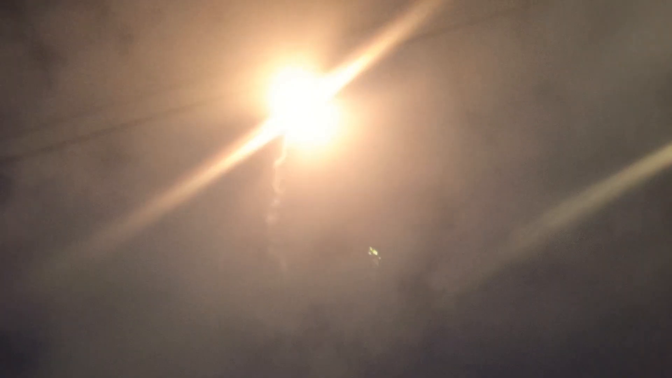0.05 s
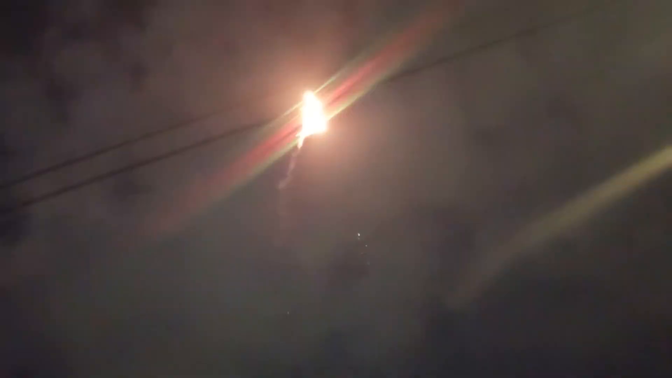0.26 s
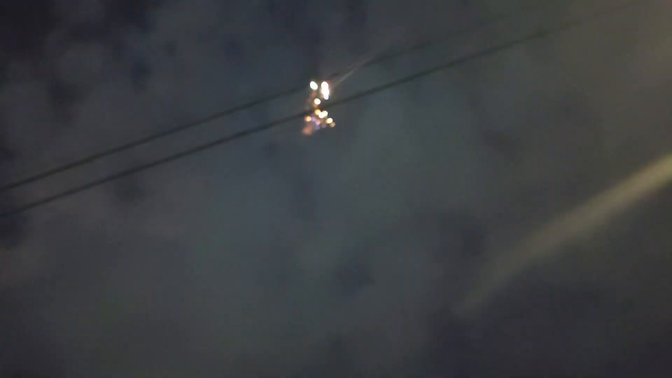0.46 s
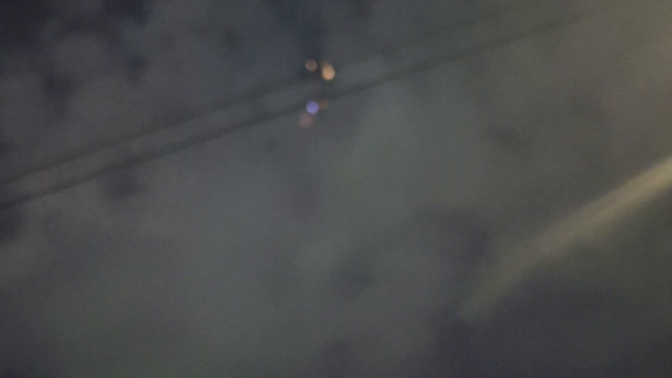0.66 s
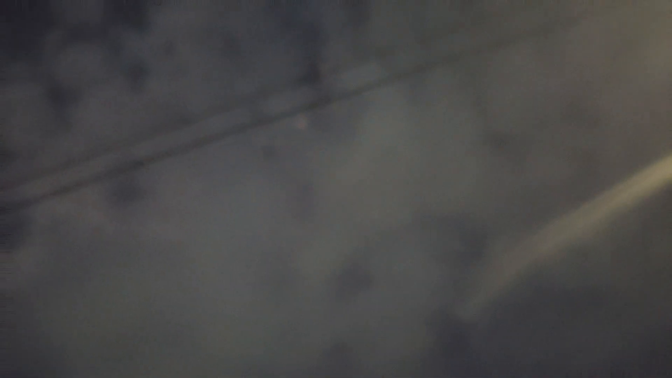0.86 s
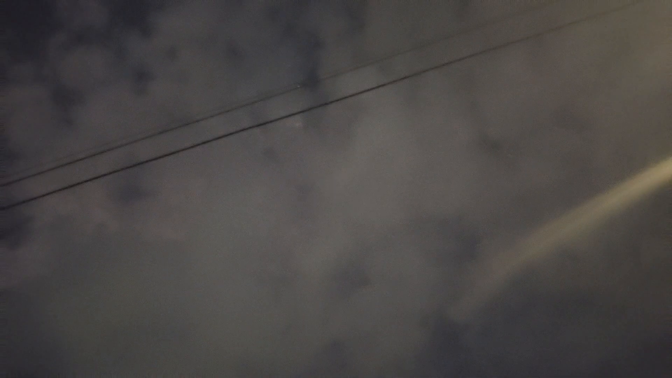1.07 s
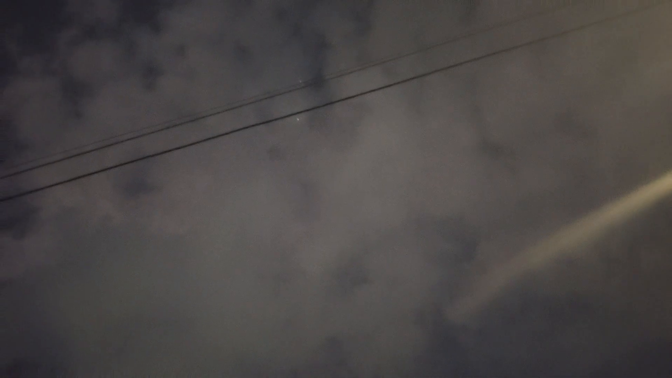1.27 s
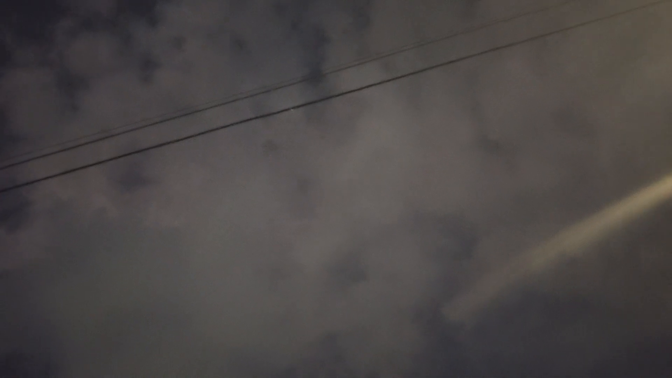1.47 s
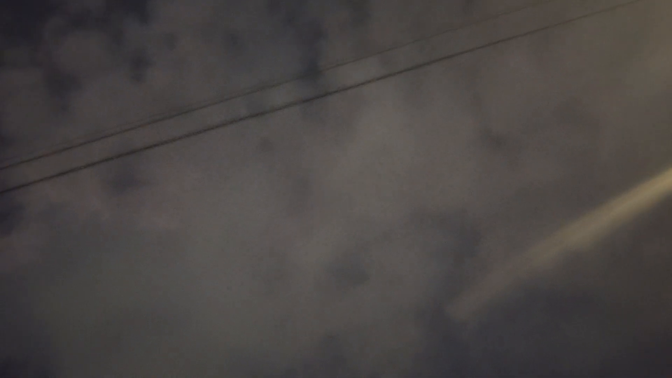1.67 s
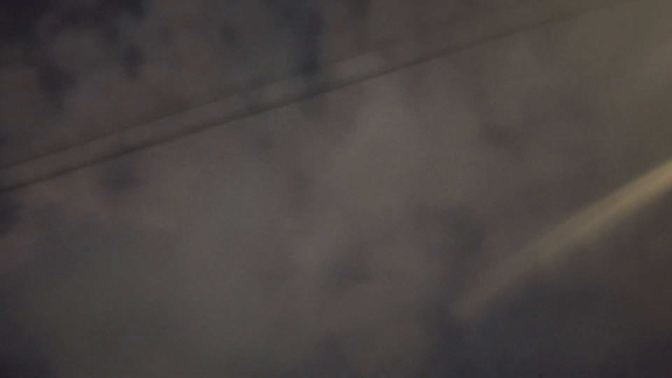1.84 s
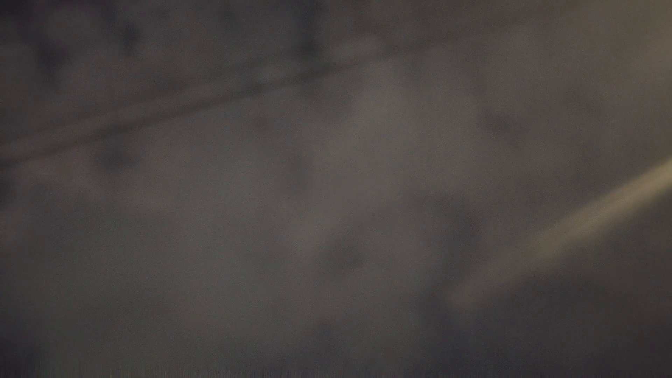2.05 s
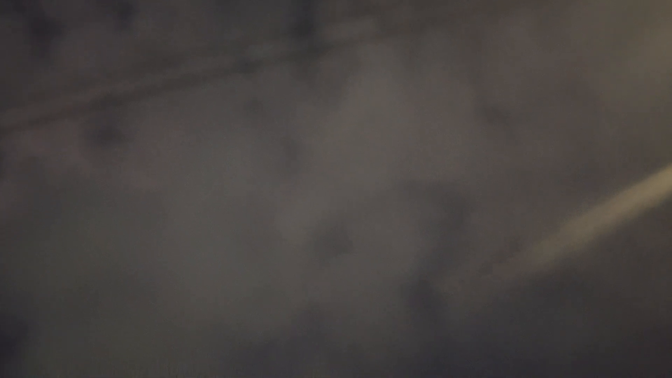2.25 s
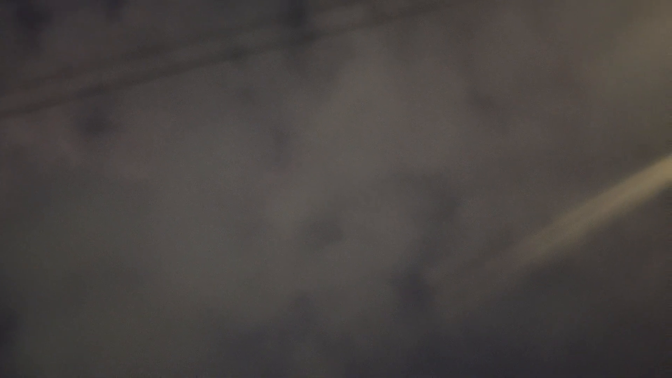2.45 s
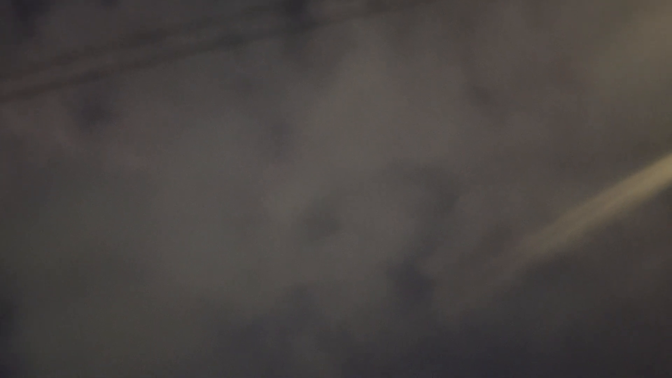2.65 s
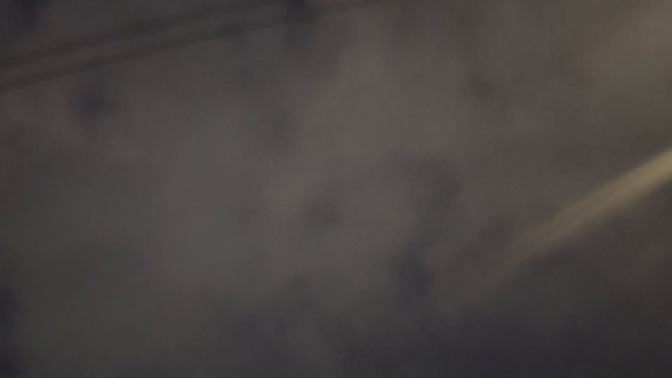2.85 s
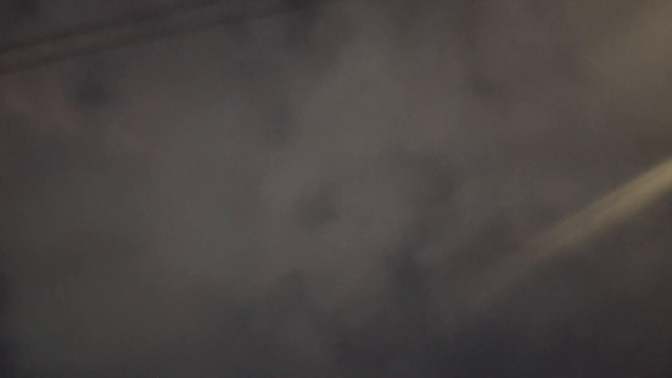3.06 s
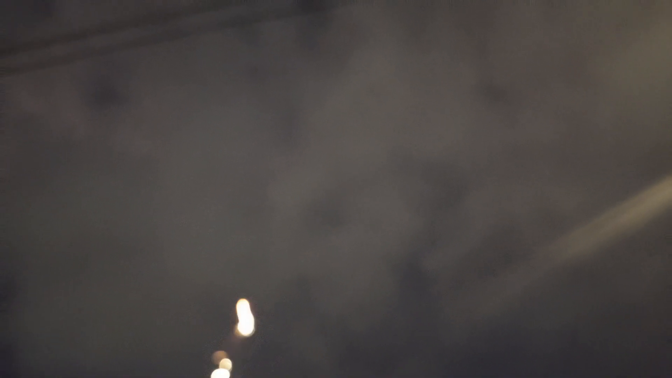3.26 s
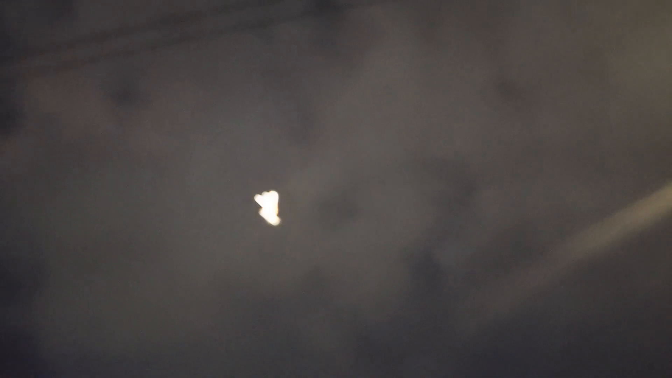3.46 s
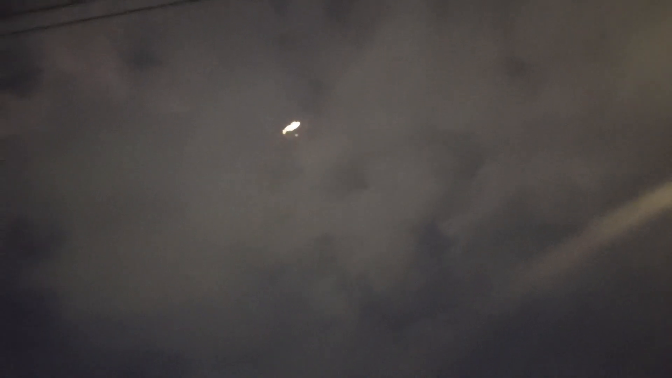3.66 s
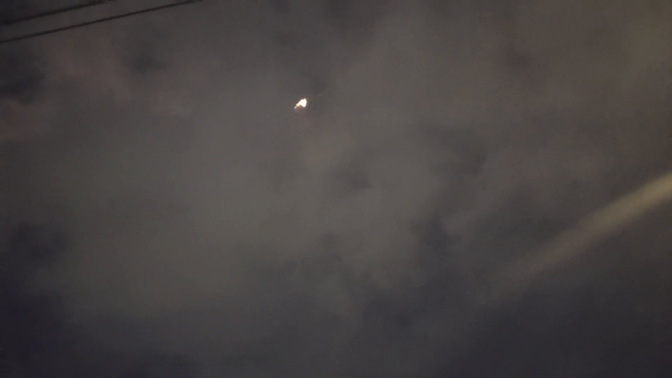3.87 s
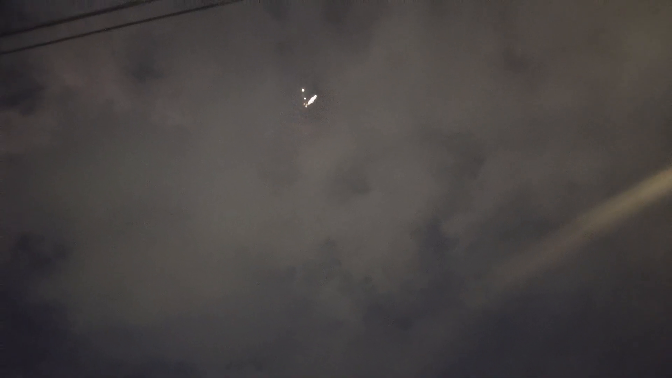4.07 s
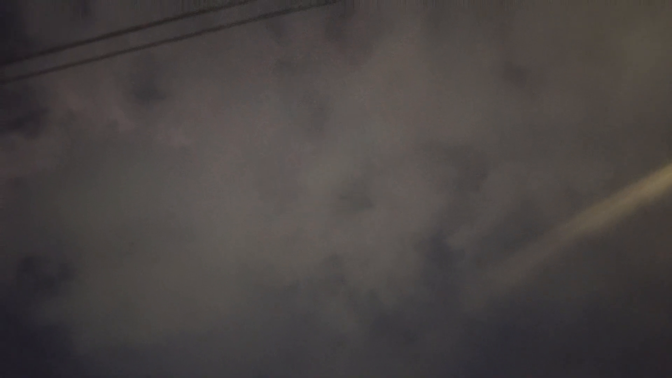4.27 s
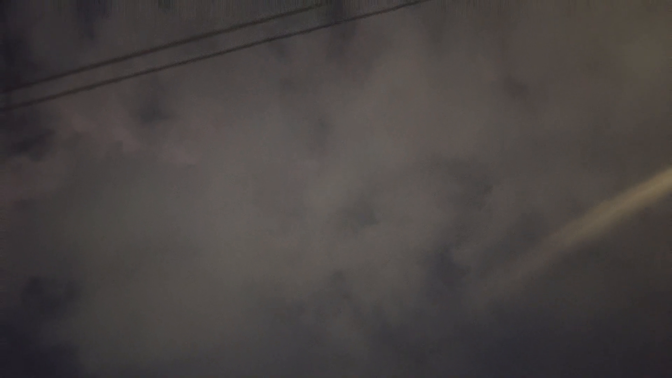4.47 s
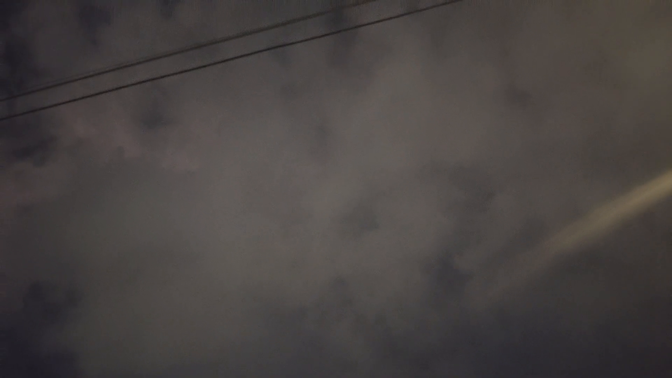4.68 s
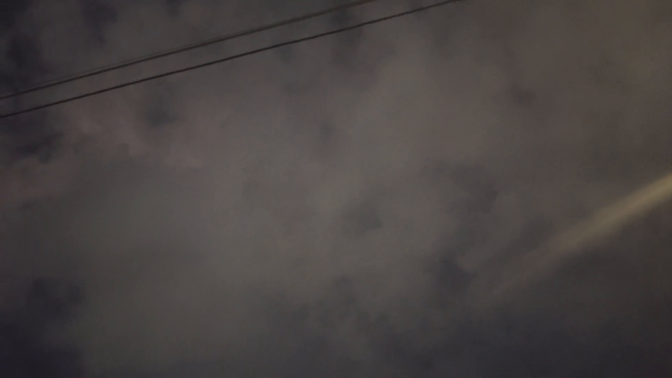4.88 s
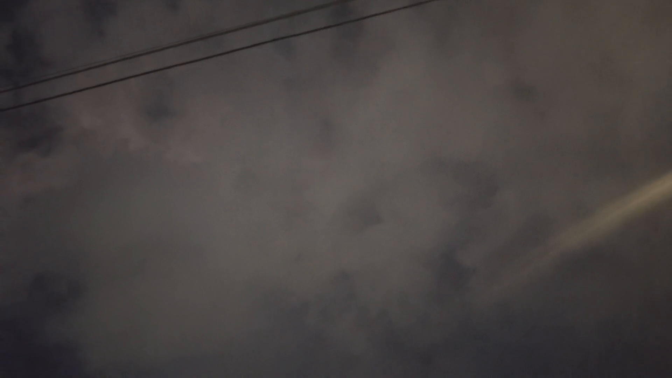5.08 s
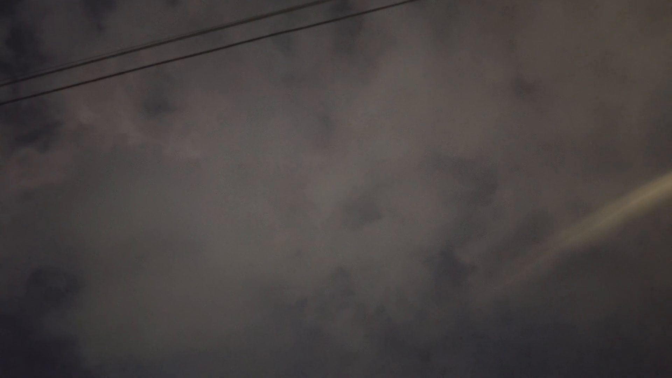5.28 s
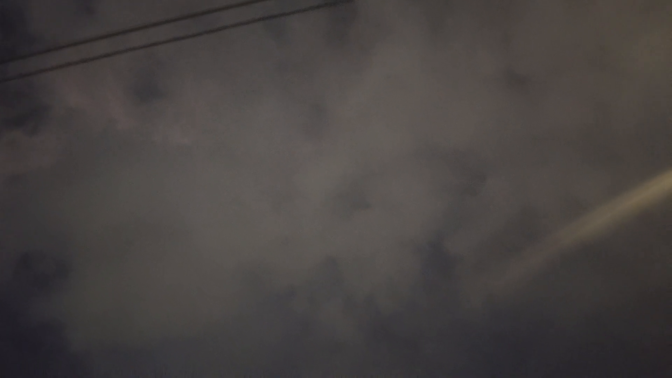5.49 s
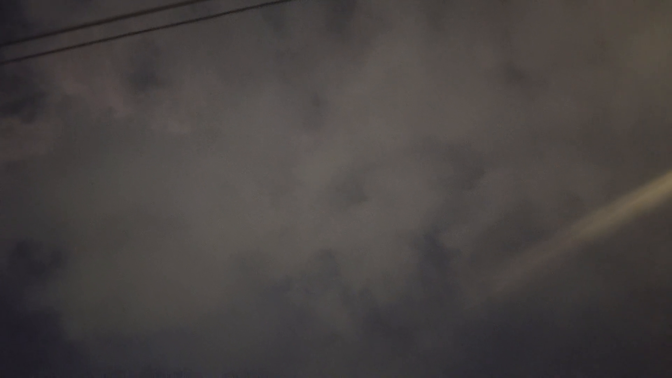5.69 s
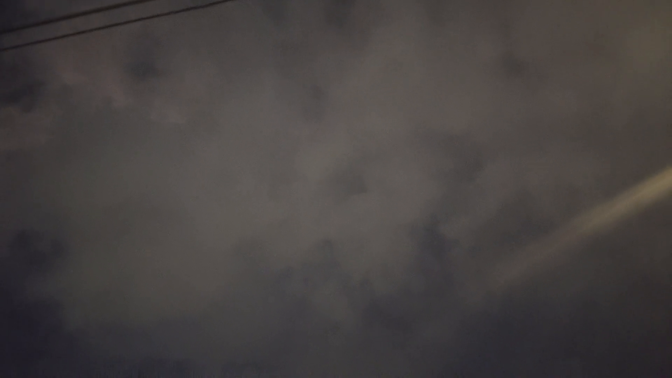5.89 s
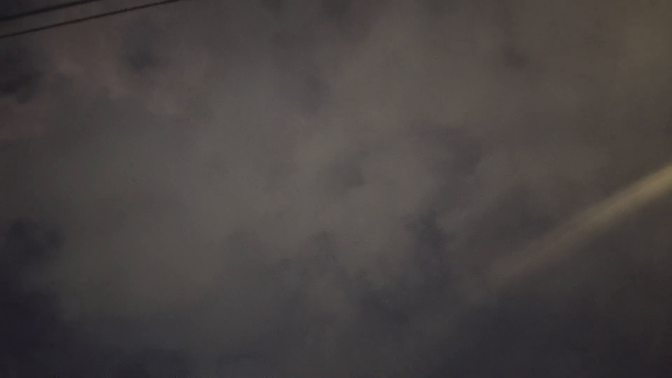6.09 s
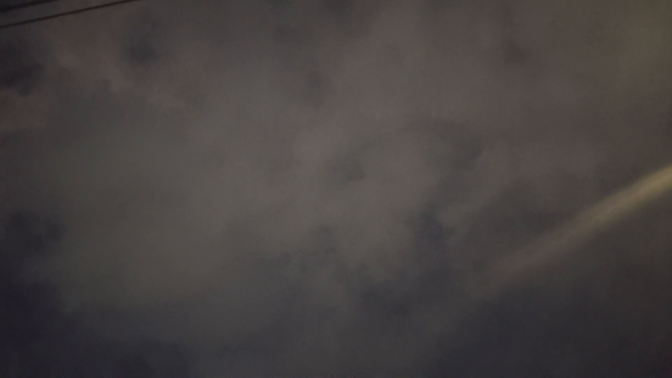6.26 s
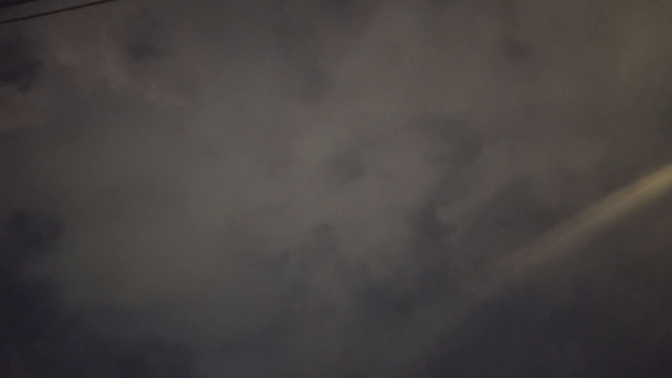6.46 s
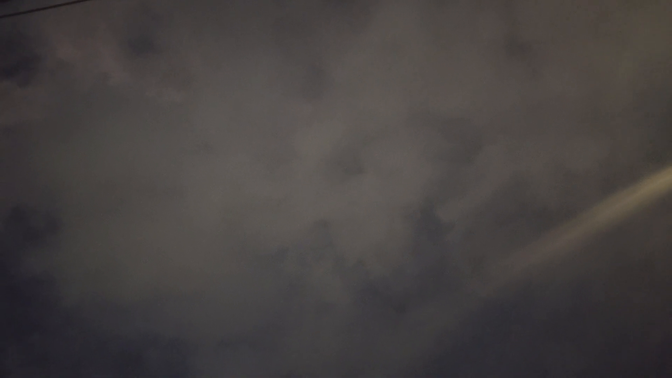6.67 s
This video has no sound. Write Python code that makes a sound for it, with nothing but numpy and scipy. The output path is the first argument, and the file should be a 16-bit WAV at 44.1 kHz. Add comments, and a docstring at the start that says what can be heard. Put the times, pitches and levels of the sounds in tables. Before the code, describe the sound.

Night street: a firework crack and passing motorbike, then a launch bang with a shrill warbling whistle dropping in pitch, quiet, and one late pop.

```python
"""Firework tube beside a night street

A shot rings off the houses while a motorbike passes; its engine is firing-rate tones, thuds and puffs of noise.
Then a whistling star is launched, tumbles, falls in pitch and dies into its echo: a gliding tone with
overtones and a hiss, repeated by sparse echoes. Sparks spit and a far shell pops: short pulses and noise.
Traffic rumble, shaped noise, fades away and insects hum faintly in narrow noise bands.
"""
import sys
import numpy as np
from scipy import signal
from scipy.io import wavfile
from scipy.ndimage import uniform_filter1d

SR = 44100
rng = np.random.default_rng(int(sys.argv[2]) if len(sys.argv) > 2 else 0)


def dump(signal):
    """Clip the signal to [-1, 1] and save it as 16-bit WAV at the path in sys.argv[1]."""
    limited = np.clip(np.atleast_2d(signal).T, -1, 1)
    pcm = np.round(limited * 32767).astype(np.int16)
    wavfile.write(sys.argv[1], SR, pcm)


N = 296793
T = np.arange(N) / SR
LIT_S, OUT_S = 3.178, 4.328  # the star burns between these moments


def gain_of(db):
    """Turns decibels into a gain."""
    return 10 ** (np.asarray(db) / 20)


def evened(x):
    """Scales a sound to rms 1."""
    return x / np.sqrt(np.mean(x ** 2) + 1e-20)


def read(points, hz):
    """Reads a table between its points, on a log-frequency axis."""
    f, value = np.transpose(points)
    return np.interp(np.log(hz + 1), np.log(f + 1), value)


def columns(rows, t):
    """Joins the rows of a curve by straight lines in time."""
    s, *rest = np.transpose(rows)
    return [np.interp(t, s, c) for c in rest]


def gate(start, end, edge):
    """Opens around start and closes around end, each over edge seconds."""
    return np.clip(np.minimum(T - start, end - T) / edge + .5, 0, 1)


def add(mix, s, sound, pan_db, lag=0):
    """Places a sound in time and between the channels; the left lags by lag samples."""
    pair = sound * gain_of([[pan_db / 2], [-pan_db / 2]])
    for channel, side, late in zip(mix, pair, (max(lag, 0), max(-lag, 0))):
        part = channel[round(s * SR) + late:][:len(side)]
        part += side[:len(part)]


def resonate(x, hz, width):
    """Keeps a band around hz: shifts hz down to zero, smooths, and shifts back."""
    turn = np.exp(2j * np.pi * hz * np.arange(x.shape[-1]) / SR)
    r = np.exp(-np.pi * width / SR)
    return 2 * (turn * signal.lfilter([1 - r], [1, -r], x / turn)).real


def wander(count, size):
    """Smooth chance of rms 1 that changes over size samples."""
    return evened(uniform_filter1d(uniform_filter1d(rng.standard_normal(count), size), size))


def noise(count, size, shape_db, patchy_db, lag=0):
    """Stereo noise from random short spectra; shape_db(hz, s) colours it, the left lags by lag samples."""
    # how alike left and right are: f/Hz, likeness (1 = identical)
    likeness = [(60, 0.97), (180, 0.98), (550, 0.013), (16000, 0.19)]
    hop = size // 4
    frames, hz = count // hop + 5, np.fft.rfftfreq(size, 1 / SR)[:, None]
    a, b, c, d, patches = rng.standard_normal((frames, len(hz), 5)).T
    patches = evened(uniform_filter1d(uniform_filter1d(patches, 4, 0), 8, 1))
    same = np.clip(read(likeness, hz), -1, 1)
    right = a + 1j * b
    shared = same * right * np.exp(-2j * np.pi * hz * lag / SR)
    left = shared + np.sqrt(1 - same ** 2) * (c + 1j * d)
    level_db = shape_db(hz, np.arange(frames) * hop / SR) + patchy_db * patches
    z = np.array([left, right]) * gain_of(level_db)
    return signal.istft(z, nperseg=size, noverlap=size - hop)[1][:, :count]


def street():
    """Traffic rumble and tyre hiss, the night air and insects are noises of different colour and width."""
    # loudness of the traffic: t/s, rumble/dB, tyre hiss/dB
    traffic = [(0, -24.5, -39), (.3, -28, -39), (.65, -33, -47.5), (1.1, -34.5, -40), (1.6, -35, -47.5),
               (3.1, -37.5, -53), (3.6, -33, -70), (4.3, -34.5, -50.5), (4.6, -44.5, -49), (5, -54, -63),
               (6.73, -61.5, -69.5)]
    # colour of the rumble: f/Hz, level per Hz/dB
    rumble_colour = [(20, -27), (50, -8), (75, -0.5), (110, 4), (170, -9), (260, -16), (500, -74.5)]
    # colour of the tyre hiss: f/Hz, level per Hz/dB
    hiss_colour = [(260, -11), (800, -14), (1240, -19.5), (2000, -17), (2600, -20.5), (3500, -38.5),
                   (5600, -36), (7000, -70), (9300, -41.5), (11500, -57.5), (16000, -57.5)]
    # colour of the quiet town air: f/Hz, level per Hz/dB
    night_colour = [(18, -27), (30, -1.5), (88, -5.5), (1910, -23.5), (2750, -49.5), (3060, -33),
                    (6050, -41.5), (6900, -35), (16000, -58.5)]
    # humming insects: f/Hz, width/Hz, level/dB
    insect_bands = [(3013, 160, -76), (6850, 200, -76), (9730, 1900, -81)]
    night_db = -56
    rumble_db, hiss_db = columns(traffic, T)
    # the left lags, so the rumble comes from the right
    rumble = evened(noise(N, 4096, lambda hz, s: read(rumble_colour, hz), patchy_db=2, lag=18))
    hiss = evened(noise(N, 1024, lambda hz, s: read(hiss_colour, hz), patchy_db=2.0))
    night = evened(noise(N, 2048, lambda hz, s: read(night_colour, hz), patchy_db=0.0))
    air = rng.standard_normal((2, N))
    out = gain_of(rumble_db) * rumble + gain_of(hiss_db) * hiss + gain_of(night_db) * night
    for hz, width, db in insect_bands:
        out += gain_of(db) * evened(resonate(resonate(air, hz, width), hz, width))
    return out


def motorbike():
    """Far off, only twice the firing rate carries; close by, uneven firings thud and gas rushes out."""
    # engine speed: t/s, firing rate/Hz
    revs = [(0, 59.94), (.68, 55.23), (.88, 80.67), (1.02, 86.06), (1.2, 82.64), (1.53, 70.18),
            (2.72, 58.55)]
    # open throttle, when the exhaust note carries: start/s, end/s, level/dB, level change/(dB/s)
    throttle = [(0.16, 0.41, -30, -25), (0.739, 1.376, -27, -10), (1.483, 2.775, -33, -0.5)]
    # exhaust rush heard close by: f/Hz, width/Hz, level/dB
    exhaust = [(325, 94, -7.5), (1990, 1090, -5.5), (4882, 4300, -27), (9030, 1500, -25.5),
               (14600, 3200, -38)]
    # gap between the walls where the bike is in view: start/s, end/s
    in_view = (0.802, 1.011)
    throttle_edge_s, screen_db = 0.083, -10  # walls screen the bike outside the gap
    pass_s, pass_db, closest_m, speed_m_per_s = 0.97, -25, 2.86, 17  # the closest moment
    gone_s = 2.9  # it turns a corner
    fourth_db = -10  # four times the firing rate booms close by
    hz, = columns(revs, T)
    away = (T - pass_s) * speed_m_per_s / closest_m
    near_db = pass_db - 10 * np.log10(1 + away ** 2) - 200 * np.maximum(T - gone_s, 0)
    near_db = near_db + screen_db * (1 - gate(*in_view, 0.13))
    pull = np.zeros(N)
    for start, end, db, fading in throttle:
        level_db = db + fading * np.clip(T - start, 0, end - start)
        pull += gate(start, end, throttle_edge_s) * gain_of(level_db)
    turns = np.cumsum(hz * (1 + .012 * wander(N, size=900))) / SR
    note = np.sqrt(2) * np.sin(4 * np.pi * turns) * pull * gain_of(1.0 * wander(N, size=1500))
    note += np.sin(8 * np.pi * turns) * gain_of(near_db + fourth_db)
    turns = turns + .11 * wander(N, size=300)  # ragged ignition
    firing, since = turns.astype(int), turns % 1
    strength = 0.7 + rng.random(N)[firing] ** 2
    thuds = -evened(resonate(strength * np.exp(-((since - .15) / 0.048) ** 2), 167, 180))
    out = np.zeros((2, N))
    add(out, 0, note + gain_of(near_db + 1.5) * thuds, 0, lag=18)
    for f, width, db in exhaust:
        gust = 1.53 * rng.random(N)[firing] ** 3  # each firing spits unevenly into each band
        puffs = (0.3 + gust * np.exp(-since / 0.34)) * rng.standard_normal((2, N))
        air_db = (near_db - near_db.max()) * f / 13000.  # distance takes the treble first
        rush = evened(resonate(resonate(puffs, f, width), f, width))
        add(out, 0, gain_of(near_db + db + air_db) * rush, -4.)
    return out


def drones():
    """Engines farther off hum briefly as steady low sines."""
    # hums of other traffic: start/s, end/s, f/Hz, level/dB
    hums = [(0, 0.226, 100, -33), (1.043, 1.3, 94.8, -32)]
    out = np.zeros((2, N))
    for start, end, hz, db in hums:
        hum = np.sqrt(2) * gate(start, end, 0.13) * np.sin(2 * np.pi * hz * T)
        add(out, 0, gain_of(db) * hum, 0, lag=18)
    return out


def blasts():
    """A pressure jump and suction, then small bounces that pull the other way; air takes the top."""
    # blasts and slaps off walls: t/s, peak before the air dulls it/dB, pulse width/ms, left-right/dB
    bangs = [(0.1299, -0.5, 0.12, -4), (0.1425, -8, 0.17, 7.5), (3.1756, -5, 0.12, 13.5),
             (3.2116, -11, 0.33, 10), (3.293, -5.5, 0.088, -5), (3.3309, -11, 0.22, 9.5),
             (3.3698, -9, 0.093, 7.5), (6.4196, -15.5, 0.13, 4)]
    scatter_db, scatter_ms = -2.5, 0.78  # the ground near the tube scatters each one
    lift_s, lift_db, lift_ms = 3.1716, -8.5, 1.56  # the low push of the lift charge
    out, t = np.zeros((2, N)), np.arange(400) / SR
    air = signal.butter(4, 6200, fs=SR, output="sos")
    chance = rng.standard_normal((len(bangs) + 1, 2, len(t)))
    for (s, db, ms, pan_db), bounces in zip(bangs, chance):
        u = t * 1000 / ms - 3
        pulse = -u * np.exp(.5 - u ** 2 / 2)
        after = np.maximum(t * 1000 - 4 * ms, 0) / scatter_ms
        rough = resonate(bounces, 1000 / ms * 0.38, 2300.0) * 2.8 - 1.2
        cluster = after * np.exp(-after ** 2) * rough
        add(out, s, gain_of(db) * signal.sosfilt(air, pulse + gain_of(scatter_db) * cluster), pan_db)
    u = (t - t.mean()) * 1000 / lift_ms
    rough = 1 + 1.33 * resonate(chance[-1], 810.0, 1640.0)
    add(out, lift_s - t.mean(), gain_of(lift_db) * np.exp(-u ** 2 / 2) * rough, 0)
    return out


def rolls():
    """Dense echoes of a bang swell and die as noise, the treble first."""
    # crowds of echoes: t/s, level/dB, rise/s, length and time of the common 60 dB fade/s,
    # treble shelf/dB, left-right/dB
    crowds = [(0.134, -31.5, 0.072, 1.66, 4, -7.5), (2.6, -56, 0.0068, 1.05, -33, -9),
              (2.76, -47, 0.11, 0.82, -26, -6), (3.178, -26.5, 0.15, 1.7, -2.5, -1),
              (6.41, -16, 0.033, 0.23, -18, -1.5), (6.438, -34.5, 0.28, 0.8, -5.5, -6.5),
              (6.568, -36, 0.026, 0.57, -12.5, -5)]
    # colour of the echoes: f/Hz, level per Hz/dB
    colour = [(60, -53), (250, -17.5), (1000, -17.5), (2000, -11), (2600, -13), (3400, -19), (5900, -25.5),
              (7200, -34.5), (16000, -46)]
    out = np.zeros((2, N))
    for s, db, rise, t60, shelf_db, pan_db in crowds:
        t = np.arange(round(t60 * SR)) / SR

        def field(hz, s):
            shelf = shelf_db * hz ** 4 / (hz ** 4 + 2730.0 ** 4)
            extra_fade = 60 * s / t60 * (hz / 4600.0) ** 0.26  # stronger for higher pitches
            return read(colour, hz) + shelf - extra_fade

        crowd = noise(len(t), 256, field, patchy_db=0.5)
        crowd /= np.std(crowd[:, :len(t) // 10])
        add(out, s, gain_of(db - 60 * t / t60) * np.minimum(0.49 + t / rise, 1) * crowd, pan_db)
    return out


def spits():
    """Sparks and the far shell's spray are bright noise: a sharp start, a sag, an abrupt end."""
    # sprays: t/s, level/dB, duration/s, approximate brightness/(dB/octave)
    sprays = [(1.929, -56.5, 0.016, -1), (4.712, -48, 0.1, 3), (5.1985, -52.5, 0.0028, -1),
              (5.2045, -50.5, 0.1, 6), (5.2078, -51, 0.025, -3), (6.4116, -37, .1, -1.5)]
    # their common colour: f/Hz, level per Hz/dB
    colour = [(100, 16), (3000, 5.5), (5400, 11.5), (16000, 1.5)]
    out = np.zeros((2, N))
    for s, db, lasts, bright_db in sprays:
        t = np.arange(round((lasts + 0.079) * SR)) / SR
        field = lambda hz, s: read(colour, hz) + bright_db * np.log2(hz + 2000.)
        spray = evened(noise(len(t), 256, field, patchy_db=3))
        shape_db = 5.7 * np.exp(-t / 0.002) - 190 * t - 600 * np.maximum(t - lasts, 0)
        add(out, s, gain_of(db + shape_db) * spray, -4.5)
    return out


def screech(age, glide_hz):
    """A wide band of noise rasps above the young note, glides down and fades as the note takes over."""
    base_hz, half_width_hz = 3480, 520
    level_db, until_s, fade_db_per_s = -22.5, .24, -24
    low = signal.butter(4, half_width_hz, fs=SR, output="sos")
    a, b = signal.sosfilt(low, rng.standard_normal((2, 2, len(age))))
    turn = np.exp(2j * np.pi * np.cumsum(base_hz + glide_hz) / SR)
    rasp = evened(((a + 1j * b) * turn).real)
    return rasp * gain_of(level_db + fade_db_per_s * np.maximum(age - until_s, 0))


def whistle():
    """An unsteady flame sings in its paper tube; the pitch arches between dips as the star tumbles."""
    # tumbling, with a pitch dip at each swing: t/s, overtones at the top of the arch that follows/dB
    swings = [(3.223, -12), (3.261, 0), (3.311, -12), (3.367, -5), (3.408, -11), (3.473, 2), (3.513, -7),
              (3.564, 1), (3.591, -11), (3.637, -2), (3.66, -7), (3.701, -2), (3.72, -8), (3.782, -9),
              (3.856, -12), (3.928, -8), (3.963, -3), (4.044, -9), (4.103, -13), (4.165, 0), (4.262, 0)]
    # overtones of the note: multiple of its pitch, level/dB
    overtones = [(2, -3), (3, 2), (4, 6)]
    # the flame flutters at half pitch: t/s, level of each sine/dB, half-width/s
    flutters = [(3.48, -35, .035), (4.312, -31, .022)]
    # echoes off the nearest walls: delay/ms, level/dB, left-right/dB
    slaps = [(12.5, -4, -3), (37, -15, -5), (81, -19, 2)]
    # pitch drops fast as the star leaves the tube, then sags as the powder burns down
    settled_hz, sag_hz, sag_s, extra_hz, settle_s = 3045, 880, .6, 790, .08
    # a longer swing arches higher; the tumbling calms down
    arch_hz_per_s, longest_arch_s, calming_s = 9300, .056, .72
    # a last plunge in pitch, with the overtones flaring just before; then it flicks up as the flame goes out
    gasp_s, gasp_hz, gasp_fall_s, gasp_db, flick_hz = 4.284, 350, .012, 5, 800
    full_db, weak_db, grow_s = -9, -15.5, 0.23  # the note grows to full strength
    hoarse_db, hoarse_s, lock_s = 25, .2, .17  # it starts hoarse; the clean note is there after lock_s
    beam_db, beam_db_per_s, beam_from_s = -21, -.5, 3.25  # overtones set in a little late
    jet_db, jet_db_per_s = -27, -7  # the hiss fades as the star climbs
    air_db_per_s = -7.5  # at 10 kHz: the air takes the treble as the star climbs
    pan_db_start, pan_db_per_s = 1.5, -7  # left-right: it drifts to the right

    s, turned_db = np.transpose([(LIT_S, 0), *swings, (OUT_S, 0)])
    t = np.arange(LIT_S, OUT_S, 1 / SR)
    age = t - LIT_S
    swing = np.interp(t, s, np.arange(len(s)))
    which = swing.astype(int)
    arch = np.sin(np.pi * (swing % 1))
    turned = turned_db[which] * arch
    length = np.minimum(np.diff(s, append=OUT_S), longest_arch_s)
    rise = arch_hz_per_s * length * np.exp(-(s - LIT_S) / calming_s)
    gasp_at = [gasp_s - gasp_fall_s, gasp_s, gasp_s + gasp_fall_s, OUT_S - gasp_fall_s]
    gasp = np.interp(t, gasp_at, [0, 1, 1, 0])
    sag = sag_hz * np.exp(-age / sag_s)
    drop = extra_hz * np.exp(-age / settle_s)
    hz = settled_hz + sag + drop + rise[which] * arch - gasp_hz * gasp
    hz += flick_hz * np.maximum(1 - 2 * (OUT_S - t) / gasp_fall_s, 0)
    phase = 2 * np.pi * np.cumsum(hz * (1 + .003 * wander(len(t), size=90))) / SR

    # with the overtones weaker at the arch tops, the note sinks a little too
    note_db = full_db + weak_db * np.exp(-(age / grow_s) ** 2) + 0.32 * turned
    fuzz = wander(len(t), size=60) + 1j * wander(len(t), size=60)
    fuzz = gain_of(-26 + hoarse_db * np.exp(-age / hoarse_s)) * fuzz
    note = gain_of(note_db) * ((np.minimum(age / lock_s, 1) + fuzz) * np.exp(1j * phase)).real
    half = sum(gain_of(db) * np.exp(-((t - at) / lasts) ** 2) for at, db, lasts in flutters)
    half = half * (1 + .4 * wander(len(t), size=80))
    note += half * sum(np.sin(k * phase / 2) for k in (1, 3, 5))  # every other cycle is stronger

    # the overtones beam from the tube mouth, which faces us at each dip
    over_db = beam_db + beam_db_per_s * age - 900 * np.maximum(beam_from_s - t, 0) + turned
    over_db = over_db + gasp_db * np.exp(-((t - gasp_s) / gasp_fall_s + 1) ** 2)
    beam = np.zeros(len(t))
    for k, db in overtones:
        unsteady_db = 3.5 * wander(len(t), size=300)
        top_db = -.012 * np.maximum(k * hz - 14800, 0)
        air_db = air_db_per_s * age * (k * hz / 1e4) ** 2
        beam += gain_of(over_db + db + unsteady_db + top_db + air_db) * np.sin(k * phase)
    beam *= 1 + .55 * wander(len(t), size=30)  # the flame roughens them

    def jet_field(hz, s):
        return 40 * np.log10((hz + 1) / (hz + 350.)) + air_db_per_s * s * (hz / 1e4) ** 2

    jet = evened(noise(len(t), 256, jet_field, patchy_db=3))
    jet *= gain_of(jet_db + jet_db_per_s * age + .35 * turned + 1.8 * wander(len(t), size=500))
    rasp = screech(age, sag + .5 * drop)

    out, edges = np.zeros((2, N)), signal.windows.tukey(len(t), .006)
    sides = edges * gain_of(np.outer([.5, -.5], pan_db_start + pan_db_per_s * age))
    add(out, LIT_S, note * sides, 0, lag=-2)
    add(out, LIT_S, (beam + jet + rasp) * sides, 0, lag=-1)
    slapped = (note + .4 * beam + jet) * edges  # walls weaken the overtones
    for ms, db, pan_db in slaps:
        add(out, LIT_S + ms / 1000, gain_of(db) * slapped, pan_db, lag=-3)
    return out


def houses(x):
    """Sparse echoes of random sign, each band dying at its own speed, partly different on each side."""
    # how long echoes last: f/Hz, time to fall 60 dB/s
    dying_times = [(500, 0.35), (3400, 0.96), (12000, 0.46)]
    # what the houses give back: f/Hz, level/dB
    returned = [(1700, -8), (3400, 1.6), (12000, -2)]
    taps, size = np.zeros((2, 2 * SR)), 20  # one echo in every 20 samples
    at = np.arange(400, 2 * SR - size, size)
    at = at + rng.integers(0, size, (2, len(at)))
    np.put_along_axis(taps, at, rng.choice([-1., 1.], at.shape), 1)
    hz, t, z = signal.stft(taps, SR, nperseg=256)
    dying = gain_of(-60 * t / read(dying_times, hz)[:, None])
    tail = signal.istft(z * gain_of(read(returned, hz)[:, None]) * dying, SR, nperseg=256)[1]
    tail[1] = .5 * tail[0] + .95 * tail[1]  # the sides hear partly the same walls
    return signal.fftconvolve(x, tail / np.linalg.norm(tail[0]), axes=1)[:, :N]


def booms():
    """The low end of a bang rolls on down the street: dull noise swells quickly and dies."""
    # low rolls: t/s, level/dB, f/Hz, width/Hz, time to fall 60 dB/s
    low_rolls = [(3.185, -27, 294.6, 500, 1.22), (6.419, -38, 115, 199, 1.1)]
    out = np.zeros((2, N))
    for s, db, hz, width, t60 in low_rolls:
        t = np.arange(round(t60 * SR)) / SR
        dull = evened(resonate(resonate(rng.standard_normal(len(t)), hz, width), hz, width))
        add(out, s, gain_of(db - 60 * t / t60) * np.minimum(t / 0.017, 1) * dull, 2.5)
    return out


def scene():
    """Mixes all sources; the whistle also rings between the houses."""
    echo_db, low_echo_db, low_s = -12.5, 5, 0.32  # the houses get more while the star is low
    star = whistle()
    sent_db = echo_db + low_echo_db * np.exp(-abs(T - LIT_S) / low_s)
    echo = houses(star * gain_of(sent_db))
    return star + echo + blasts() + rolls() + booms() + spits() + motorbike() + drones() + street()


def record(dry):
    """The small microphone loses the deep bass and overloads softly; then the band limit."""
    edge_hz = 16200
    thin = signal.sosfilt(signal.butter(2, 48, "high", fs=SR, output="sos"), dry)
    band_limit = signal.firwin(511, edge_hz, window=("kaiser", 9), fs=SR)
    return signal.oaconvolve(np.tanh(thin), band_limit[None], "same")


dry = scene()
out = record(dry)
dump(out)
```